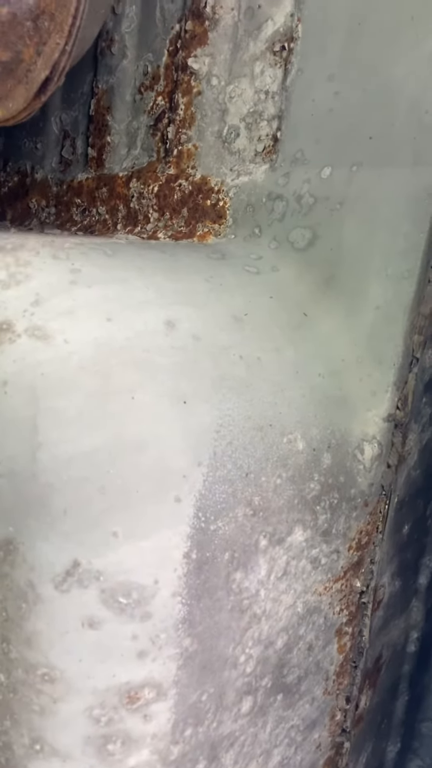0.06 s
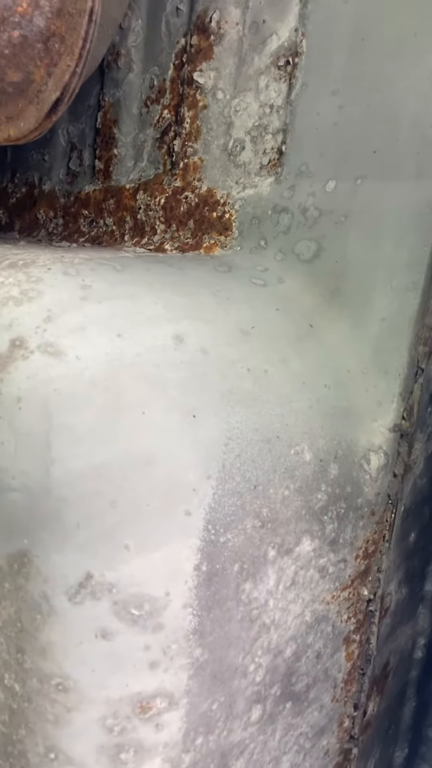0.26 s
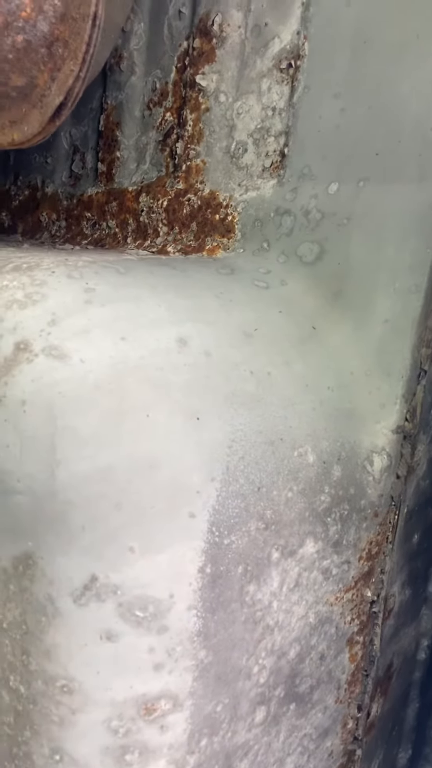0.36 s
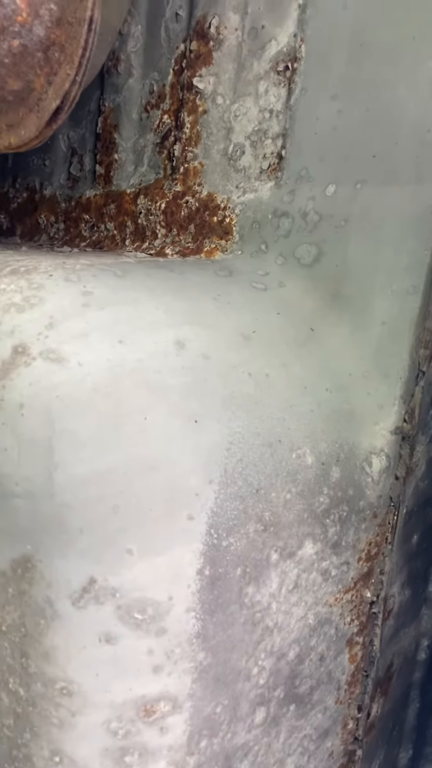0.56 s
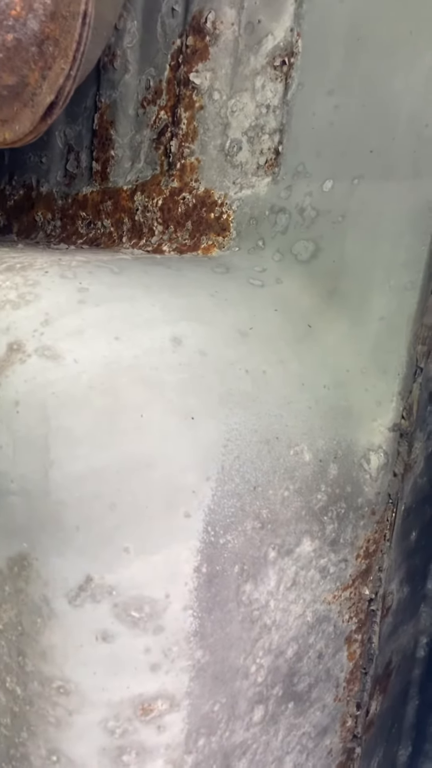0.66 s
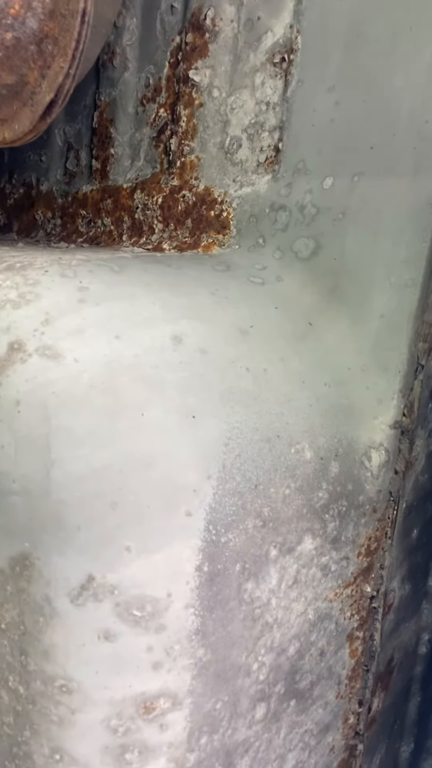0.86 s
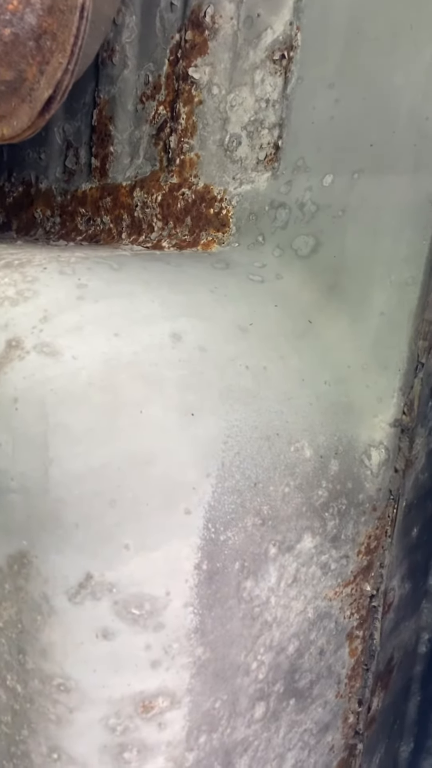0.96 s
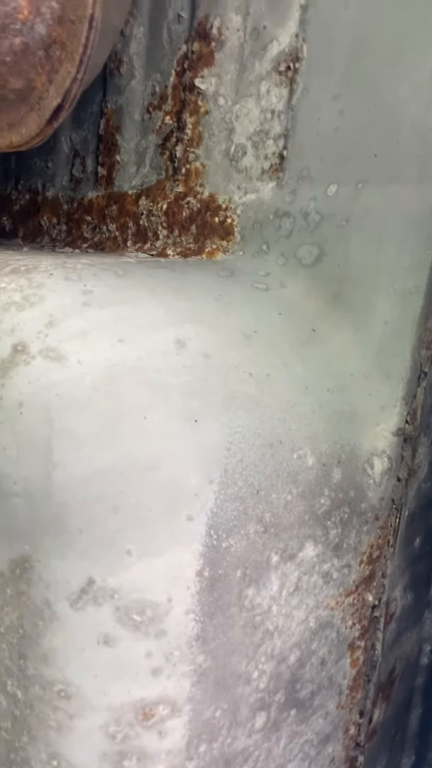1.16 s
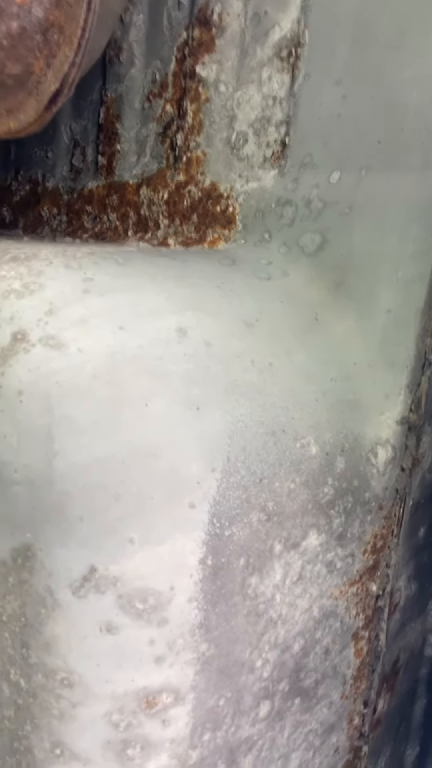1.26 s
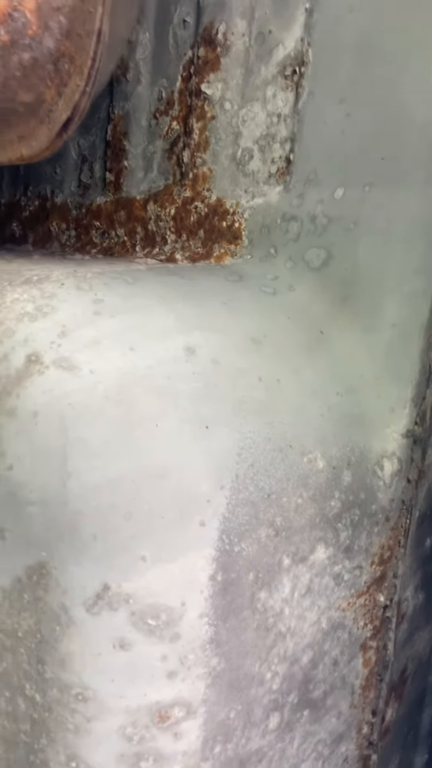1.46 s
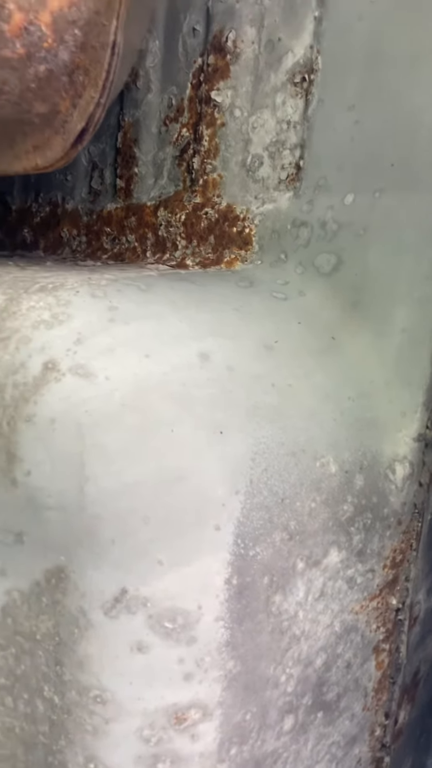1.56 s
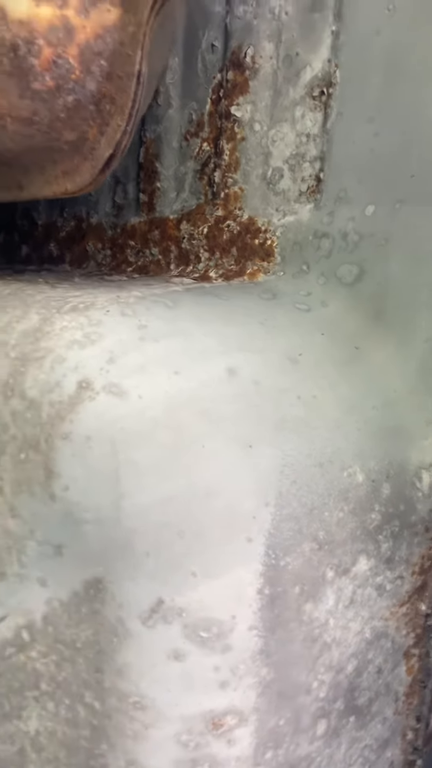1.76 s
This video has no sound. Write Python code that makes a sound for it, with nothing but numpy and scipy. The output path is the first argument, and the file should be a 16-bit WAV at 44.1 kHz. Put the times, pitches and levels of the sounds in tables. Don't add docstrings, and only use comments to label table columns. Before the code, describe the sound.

Wooden stick knocks four times on a hollow steel tank, bouncing lightly, over faint traffic rumble

```python
import sys
import numpy as np
from scipy import signal
from scipy.fft import rfft, irfft, next_fast_len
from scipy.io import wavfile
from scipy.ndimage import uniform_filter1d

SR = 44100
rng = np.random.default_rng(int(sys.argv[2]) if len(sys.argv) > 2 else 0)


def voltage_ratio(level):
    return 10 ** (np.asarray(level, float) / 20)


def generate_wav(signal):
    frames = np.transpose(np.atleast_2d(signal))
    scaled = np.clip(frames, -1, 1) * 32767
    pcm = np.round(scaled).astype(np.int16)
    wavfile.write(sys.argv[1], SR, pcm)


N = 81585


def read(table, hz):
    table = np.array(table, float)
    return np.interp(np.log(np.maximum(hz, 1)), np.log(table[:, 0]), table[:, 1])


def walk(rate_hz):
    hold = int(SR / rate_hz)
    steps = np.repeat(rng.standard_normal(64), hold)
    smooth = uniform_filter1d(uniform_filter1d(steps, hold), hold)
    return 1.38 * np.resize(smooth, N)


# (frequency [Hz], level [dB per Hz])
TRAFFIC_SPECTRUM = [(25, -6), (45, 1.5), (115, 1), (250, -10), (600, -18.5), (2000, -24.5), (6000, -38.5),
                    (16500, -66)]


def traffic():
    level_db, swell_db, flicker_db = -35, -0.13, -1
    hz = np.arange(N // 2 + 1) * SR / N
    swell = walk(2.2)
    spectrum = rfft(rng.standard_normal((3, N))) * voltage_ratio(read(TRAFFIC_SPECTRUM, hz))
    half_octave = 2 * np.log2(np.maximum(hz, 1) / 20)
    out = 0
    for k in range(21):
        band = irfft(spectrum * np.clip(1 - abs(half_octave - k), 0, 1), N)
        out = out + band * voltage_ratio(swell_db * swell + flicker_db * walk(8.51))
    return out * voltage_ratio(level_db) / np.std(out)


# (start [s], length [s], level [dB])
RUST_FALLS = [
    (0.199, 0.046, -48.5),
    (.238, 0.0097, -45.5),
    (0.292, 0.0082, -40),
]
# (frequency [Hz], level [dB])
RUST_SPECTRUM = [(1500, -18), (3000, 13.5), (4200, 15), (7000, 2), (11000, -4.5), (16000, -8)]


def rust():
    grain_db, grain_s, rise_s = 3.0, .0006, 0.0017
    t = np.arange(N) / SR
    hz = np.arange(N // 2 + 1) * SR / N
    env = np.zeros(N)
    for start, length, db in RUST_FALLS:
        rise = np.clip((t - start) / rise_s, 0, 1)
        fall = np.clip(1 - ((t - start) / (1.43 * length)) ** 2, 0, 1)
        env += voltage_ratio(db) * rise * fall
    hold = max(int(grain_s * SR), 1)
    strength = np.minimum(rng.exponential(size=N), 2)
    grains = voltage_ratio(grain_db * np.repeat(strength, hold)[:N] - grain_db)
    noise = rng.standard_normal((3, N)) * grains * env
    return irfft(rfft(noise) * voltage_ratio(read(RUST_SPECTRUM, hz)), N)


# (time [s], level [dB], boom [dB], body [dB], brightness [dB])
KNOCKS = [
    (.2010, -12, -0.5, 2, -1.2),
    (0.709, -18, 3.7, -0.4, -5),
    (1.0997, -12, -1.2, -1.46, 3),
    (1.4631, -13.5, 0.9, 0, 4),
]
# (time [s], level [dB], lows [dB], brightness [dB], crack [dB])
BOUNCES = [
    (0.294, -38, -5.5, 2, 5.5),
    (1.1595, -18.5, -12, -14, 10),
    (1.1870, -34.5, -12, -22, 12),
    (1.524, -31.5, -1.5, -39, 12),
    (1.539, -22, -14, -12.5, 4),
    (1.5680, -36, -29, -34, 14.5),
]
# (frequency [Hz], level at three struck spots [dB, dB, dB], t60 [s])
TANK_MODES = [(81.6, 3, -1.5, 6, 0.1), (101.4, -6, -8, -10.5, 0.43), (134.8, -7, -2, -4.5, 0.16),
              (174.5, 2, -9, -2, 0.089), (225.8, 4, -4, -12, 0.0987), (284.9, -9.5, -11.5, -11, 0.17),
              (335.5, -6, -14, -7.5, 0.14), (380.6, -10.5, -5.5, -2.5, 0.063),
              (445, -11, -13.5, -2.5, 0.11), (506, -39, -18, -10.5, 0.073), (598, -7.5, -21.5, -8.5, 0.1),
              (676, -12.5, -14, -18, 0.21), (748, -4, -13, -33, 0.082)]
# (frequency [Hz], levels [dB, dB, dB], t60 [s])
STICK_MODES = [(993, -9.5, -3.5, -10.5, 0.07), (1113, -9, -17, -10, 0.063), (1208, -10, -32, -26, 0.045),
               (1430, -33, -45, -13, 0.027), (1770, -35, -44, -42, 0.099), (1871, -11, -7, -6, 0.062),
               (2022, -5.5, -10, -12, 0.083), (2120, -7, -39, -49, .07)]
# (frequency [Hz], level [dB])
FIELD_LEVEL = [(600, -22), (1000, -23.5), (2000, -21.5), (4000, -22), (7000, -28.5), (11000, -47.5),
               (13500, -58), (16500, -86)]
# (frequency [Hz], t60 [s])
FIELD_T60 = [(200, 0.12), (500, 0.19), (1100, 0.13), (2900, 0.081), (7700, 0.038), (15000, 0.07)]
# (frequency [Hz], level [dB])
CRACK_SPECTRUM = [(60, -43), (250, -9), (550, 6.5), (1200, -1.04), (2200, -12.8), (3800, 1.5),
                  (9000, -28.5), (16500, -47)]
TONE_EDGES = [100, 130, 450, 900, 2300, 3000]
SPOT_CHANGES = [.5, 1.]


def disperse(x):
    late_s, late_power, low_cut_hz = .002, .88, 68
    size = next_fast_len(N + 16384)
    hz = np.arange(size // 2 + 1) * SR / size
    delay = late_s * (1000 / (hz + 30)) ** late_power
    low_cut = 1 / (1 + (low_cut_hz / (hz + 1)) ** 4)
    phase = 2 * np.pi * np.cumsum(delay) * SR / size
    return irfft(rfft(x[:, :N], size) * low_cut * np.exp(-1j * phase), size)[:, :N]


def tank():
    scatter_db, knock_db, bounce_boom_db = 2, 3, -8
    crack_gain_db, crack_s = 20, 0.0015
    count, lead = 420, 2000
    t = np.arange(int(.4 * SR))[None] / SR
    clear = np.array(TANK_MODES + STICK_MODES, float)
    dense_hz = 500 + 15900 * ((np.arange(count) + rng.random(count)) / count) ** 1.25
    dense_t60 = read(FIELD_T60, dense_hz) * (.7 + .6 * rng.random(count))
    hz = np.r_[clear[:, 0], dense_hz]
    t60 = np.r_[clear[:, 4], dense_t60]
    bank = np.exp(-np.log(1000) * t / t60[:, None]) * np.sin(2 * np.pi * hz[:, None] * t)

    blows = [(*row, 0) for row in KNOCKS]
    blows += [(s, db, bounce_boom_db, low, hi, crack) for s, db, low, hi, crack in BOUNCES]
    out = np.zeros((3, N + t.size))
    fine_hz = np.arange(t.size // 2 + 1) * SR / t.size
    edges = np.log(TONE_EDGES)
    for s, db, boom, body, bright, crack_db in blows:
        def strength(f):
            tone_db = np.interp(np.log(f + 1), edges, [boom, body, body, 0, 0, bright])
            return voltage_ratio(db + knock_db + tone_db)

        gain = rng.standard_normal((3, len(hz)))
        gain[0, :len(clear)] = voltage_ratio(scatter_db * gain[0, :len(clear)])
        spot_db = clear[:, 1 + np.searchsorted(SPOT_CHANGES, s)]
        mode_level = voltage_ratio(np.r_[spot_db, read(FIELD_LEVEL, dense_hz)])
        ring = (gain * mode_level * strength(hz)) @ bank

        push = 0.45 * rng.standard_normal((3, t.size)) * np.exp(-t / crack_s)
        push[:, 0] = -1
        crack_tone = voltage_ratio(read(CRACK_SPECTRUM, fine_hz) + crack_gain_db + crack_db)
        crack = irfft(rfft(push) * strength(fine_hz) * crack_tone, t.size)

        i = int(s * SR)
        out[:, i:i + t.size] += ring
        out[:, i - lead:i - lead + t.size] += np.roll(crack, lead, axis=1)
    return disperse(out)


# (start [s], length [s], frequency [Hz], glide [Hz], level [dB])
CHIRPS = [
    (0.53, 0.057, 4230, -120, -45.5),
    (0.56, 0.046, 3370, -48, -48),
    (0.611, 0.041, 3480, 20, -42.5),
    (0.622, 0.031, 3280, 2, -64),
    (1.5, 0.047, 4150, -150, -50.5),
    (1.553, 0.048, 3420, -19, -45),
    (1.615, .014, 3720, 19, -46.5),
    (1.727, 0.024, 3450, 10, -79.5),
]


def birds():
    rough_db, tail_s, spread_hz = 5.0, .014, 130
    t = np.arange(N) / SR
    out = np.zeros((3, N))

    def blur():
        return uniform_filter1d(uniform_filter1d(rng.standard_normal(N), 200), 200) * 17

    for start, length, hz, glide, db in CHIRPS:
        u = np.clip((t - start) / length, 0, 1)
        rise = np.sin(np.pi / 2 * np.clip(u * 4, 0, 1))
        env = rise * np.exp(-np.maximum(t - start - length, 0) / tail_s)
        for path in range(3):
            phase = 2 * np.pi * np.cumsum(hz + glide * u + spread_hz * blur()) / SR
            out[path] += voltage_ratio(db + rough_db * blur()) * env * np.sin(phase)
    return out


# (frequency [Hz], level [dB])
GAP_COLOUR = [(680, 0), (810, -3.5), (1000, 3), (2100, -0.5), (2600, -4), (3600, -6), (4900, -6), (6000, 0)]
# (frequency [Hz], phase [rad])
PORT_PHASE_LOW = [(80, .05), (260, 1.3), (800, 1.9), (1100, 1.1), (1600, -.6), (2100, -.9), (2600, -3.1)]
# (frequency [Hz], phase [rad])
PORT_PHASE_HIGH = [(3800, -6.3), (4600, -9.0), (5700, -9.5), (7000, -10.5), (9800, -12.5), (11800, -12.6),
                   (13500, -15.4), (15500, -15.9)]
# (frequency [Hz], level difference [dB])
PORT_BALANCE = [(50, -3.5), (100, -4.5), (200, -10), (400, -6), (750, -1), (1400, 1), (4400, -.6),
                (15000, .1)]


def ports(common, left, right, alike):
    pad = 4096
    size = N + 2 * pad
    common, left, right = np.pad([common, left, right], ((0, 0), (pad, pad)), "reflect")
    hz = np.arange(size // 2 + 1) * SR / size
    share = np.clip(read(alike, hz), 0, 1)
    phase = read(PORT_PHASE_LOW + PORT_PHASE_HIGH, hz)
    tilt = voltage_ratio(read(PORT_BALANCE, hz) / 2) * np.exp(.5j * phase)
    mean_gain = np.sqrt((abs(tilt) ** 2 + abs(tilt) ** -2) / 2)
    colour = voltage_ratio(read(GAP_COLOUR, hz)) / mean_gain
    shared = np.sqrt(share) * rfft(common, size)
    pair = []
    for own, gain in ((left, tilt), (right, 1 / tilt)):
        pair.append((shared + np.sqrt(1 - share) * rfft(own, size)) * gain * colour)
    return irfft(np.array(pair), size)[:, pad:pad + N]


# (frequency [Hz], share common to both ports [0-1])
KNOCK_ALIKE = [(130, .995), (500, .9), (1200, .8), (2000, .85), (4000, .75), (4800, .97), (11500, .98),
               (14000, .7)]
# (frequency [Hz], share common to both ports [0-1])
AIR_ALIKE = [(100, .98), (1000, .6), (1900, .85), (4100, .3), (4700, .995), (6100, .99), (8000, .6),
             (10500, .95)]


def scene():
    air = traffic() + birds()
    struck = rust() + tank()
    return ports(*struck, KNOCK_ALIKE) + ports(*air, AIR_ALIKE)


def band_limit(x):
    return signal.sosfilt(signal.butter(12, 16470, fs=SR, output="sos"), x)


def record(dry):
    ceiling = 1.15
    mix = ceiling * np.tanh(dry / ceiling)
    return band_limit(mix)


dry = scene()
out = record(dry)
generate_wav(out)
```